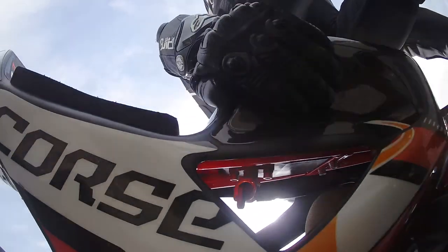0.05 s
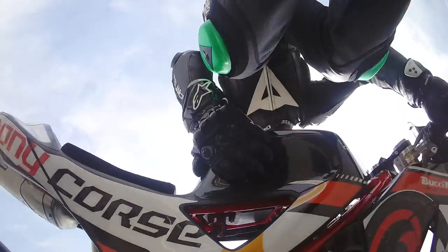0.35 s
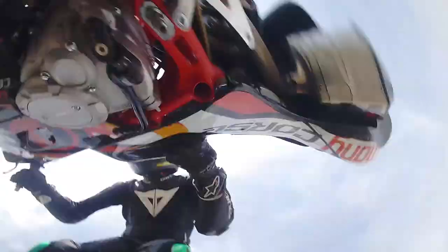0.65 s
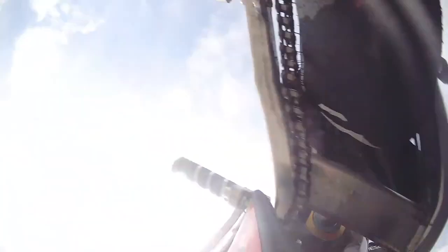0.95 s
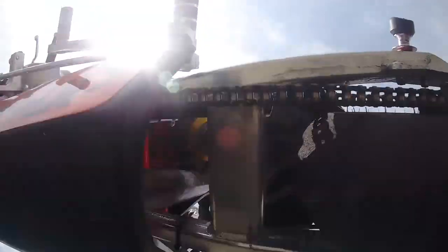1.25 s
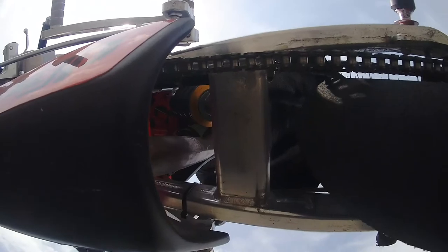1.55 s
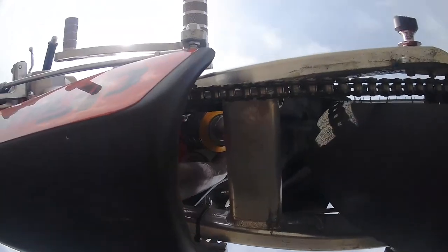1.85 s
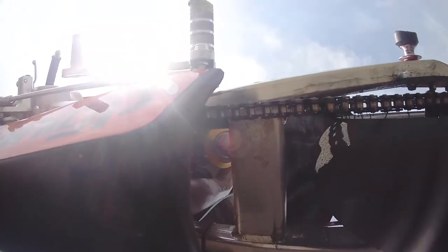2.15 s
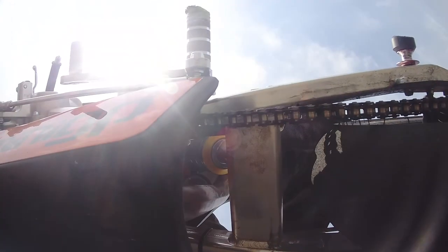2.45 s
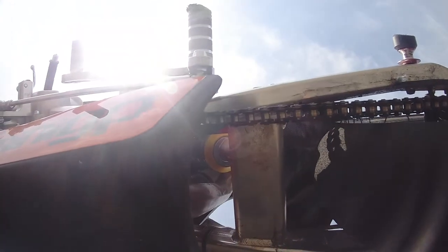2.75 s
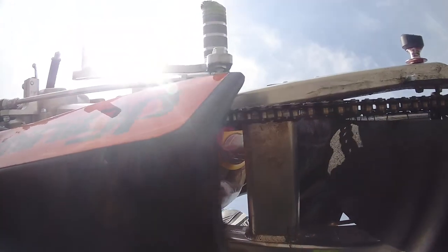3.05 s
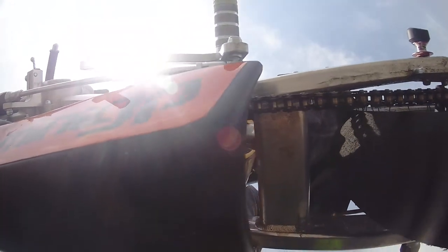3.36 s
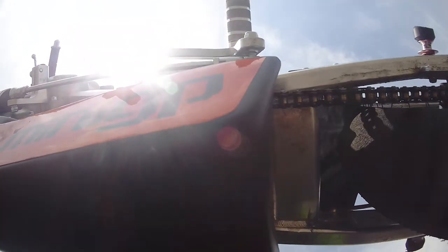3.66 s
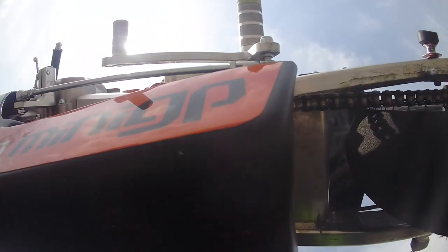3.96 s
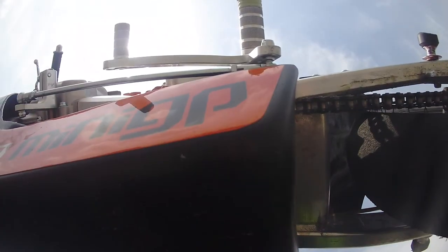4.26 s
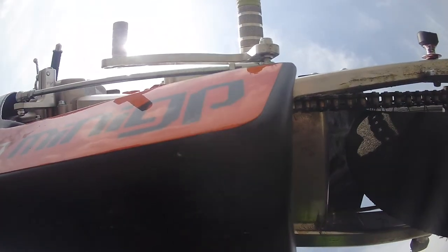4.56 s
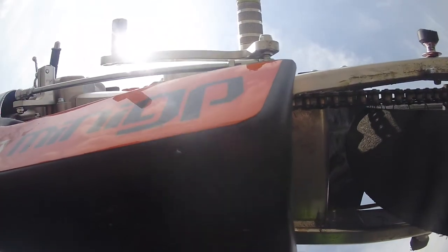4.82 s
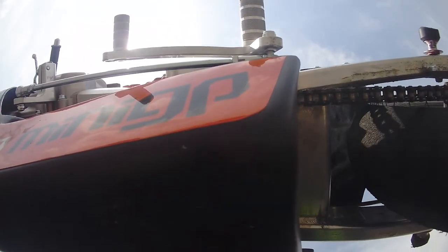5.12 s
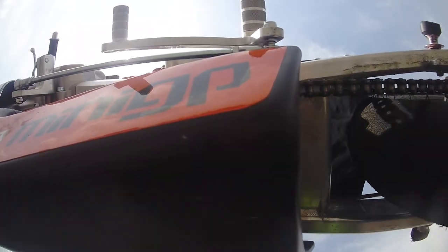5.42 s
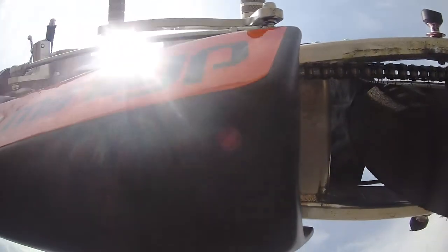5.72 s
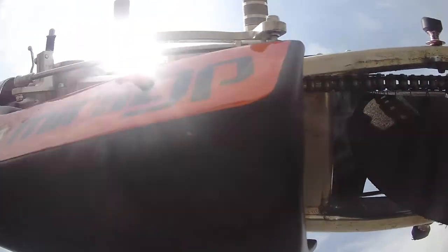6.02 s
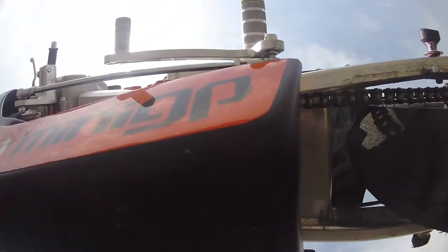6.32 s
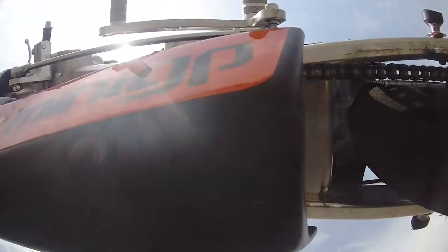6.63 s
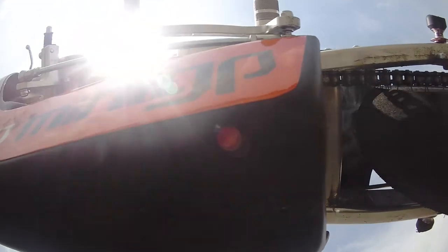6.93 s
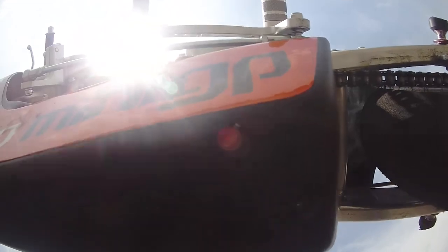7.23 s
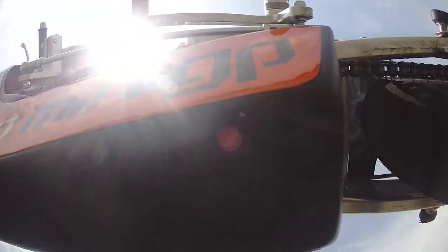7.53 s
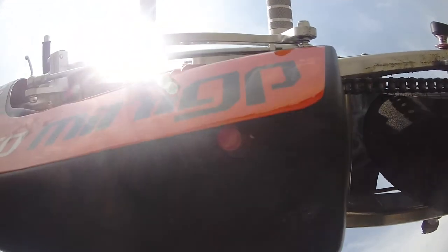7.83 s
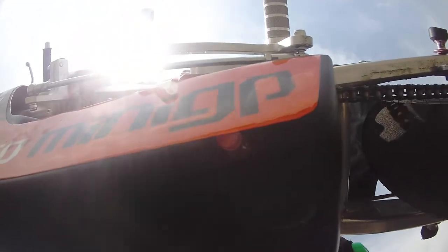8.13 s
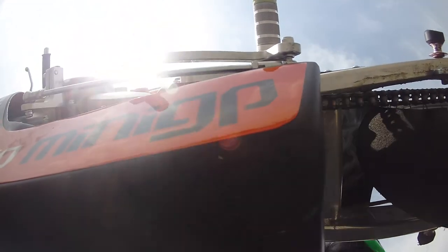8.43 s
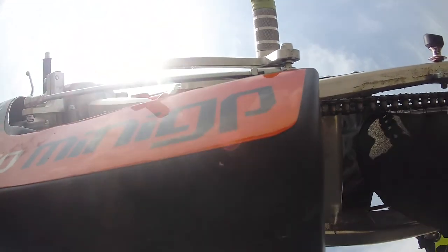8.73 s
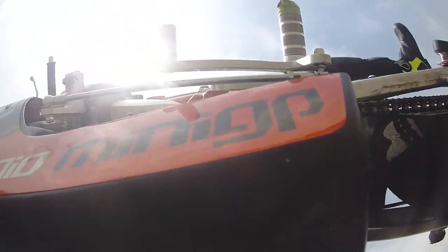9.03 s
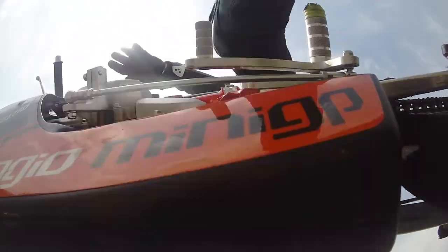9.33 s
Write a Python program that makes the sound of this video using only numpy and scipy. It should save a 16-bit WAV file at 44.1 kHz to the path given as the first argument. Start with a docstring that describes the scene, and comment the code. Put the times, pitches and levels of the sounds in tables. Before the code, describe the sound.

Loud clattering and scraping of a falling motorbike, heard from on board, ends in a short low hum, leaving small knocks and faraway engines.

```python
"""A small motorbike falls on asphalt, heard from a cased camera bolted to it. Two distant engines drone
throughout. At 0.5 s the case begins to strike and scrape the ground, each impact exciting its modes.
At 1.3 s the slide ends; the camera rocks between the stops of its springy mount, then swings freely.
From about 2 s, rubs, clinks, knocks and squeaks come through the mount, with a hard knock at 9.3 s."""
import sys
import numpy as np
from scipy import signal
from scipy.fft import rfft, irfft, next_fast_len
from scipy.io import wavfile
from scipy.ndimage import uniform_filter1d, minimum_filter1d, map_coordinates

SR = 44100
rng = np.random.default_rng(int(sys.argv[2]) if len(sys.argv) > 2 else 0)


def put_to_file(sound):
    """Save the sound as 16-bit audio at rate SR, in the file named by the first command-line argument."""
    columns = np.atleast_2d(sound).T  # one column per channel
    safe = np.clip(columns, -1, 1)
    whole_steps = np.round(safe * 32767)
    wavfile.write(sys.argv[1], SR, whole_steps.astype(np.int16))


N = 413658

CHATTER_S, CHATTER_DB = .0058, -4.5  # nominal spacing of repeated contacts; their level re the first
SLIDE_END_S, GRIT_DB = 1.32, -12.5  # the slide slows evenly to rest; scrape re blow at full speed
# The case strikes the asphalt. Each row: start in seconds, level in dB, skid length in seconds,
# roughness of the spot in dB, pitch of the hollow clank in Hz.
GROUND_STRIKES = [(0.496, 16.5, 0.0034, -2.5, 654), (0.507, 10, 0.015, -3, 503),
                  (0.542, 10, 0.0058, -5, 513), (0.558, 8.5, 0.0018, -5, 426), (0.613, 9.5, 0.0011, 4, 547),
                  (0.634, 13.5, 0.0061, -6.5, 466), (0.663, 4, 0.0046, 0.5, 367),
                  (0.708, 11, 0.012, -0.5, 535), (0.75, 7, 0.0013, 6, 320), (0.802, 8.5, 0.0055, 4, 630),
                  (0.830, 15, 0.0006, -3.5, 427.5), (0.847, 6, 0.01, 0, 637), (0.882, 8, 0.0054, -4.5, 456),
                  (0.908, 9, 0.0053, 4.5, 423.7), (0.926, 6, 0.00062, 1.5, 312),
                  (0.981, 13.5, 0.00099, -1.5, 408.1), (1.012, 11, 0.0013, 2.5, 516),
                  (1.044, 11.5, .012, 4, 412.4), (1.072, 9, 0.00087, -1, 390),
                  (1.1207, 14, 0.0011, 2.5, 623), (1.132, 12, 0.0088, 3, 486),
                  (1.2126, 15.5, 0.00064, 3.5, 754), (1.244, 4, 0.00088, 1.5, 710),
                  (1.255, 5.5, .0005, 12, 900), (1.2578, 13.5, 0.0005, 6, 405),
                  (1.3011, 12.5, 0.006, 2.5, 842)]
def contacts():
    """Contact chatter: a skidding wall touches again after a whole number of its own cycles."""
    for s, db, skid_s, rough_db, clank_hz in GROUND_STRIKES:
        speed = max((SLIDE_END_S - s) / (SLIDE_END_S - GROUND_STRIKES[0][0]), .01)
        grit_db = GRIT_DB + rough_db + 20 * np.log10(speed)
        gap_s = max(round(CHATTER_S * clank_hz), 1) / clank_hz
        for k in range(5):
            touch = min(1, 1 + skid_s / CHATTER_S - k)
            if touch > 0:
                yield s + k * gap_s, db + CHATTER_DB * (k > 0) + 20 * np.log10(touch), grit_db, clank_hz


PINNED_S, PINNED_RING = 1.3, 0.43  # from here the ground presses on the case and shortens its ring
# Modes of the case. Each row: frequency in Hz, level in dB, free decay time (T60) in seconds.
CASE_MODES = [(584, -7.5, 0.047), (926, -4, 0.019), (1223, -9.5, 0.039), (1654, -16.5, 0.038),
              (3903, -30, 0.05)]
# Spectrum of scraped grit. Each row: frequency in Hz, relative density in dB.
GRIT_SPECTRUM = [(100, -18.5), (400, -3.5), (650, -9), (2400, -9), (3000, -18.5), (4000, -18),
                 (5200, -29.5), (16000, -56)]
def crash():
    """Impact excitation: each contact rings the case and the metal behind it, and drags it over grit."""
    t = np.arange(SR // 4) / SR
    body, drag_power = np.zeros((2, N))
    scatter = rng.standard_normal(size=(5 * len(GROUND_STRIKES), len(CASE_MODES), 2))
    for (s, db, grit_db, clank_hz), chance in zip(contacts(), scatter):
        free = PINNED_RING if s > PINNED_S else 1
        tilt_db_per_hz = (grit_db - GRIT_DB) / 4000  # a soft contact leaves the upper modes quiet
        modes = 0
        for k, ((hz, level, t60), (louder, detune)) in enumerate(zip(CASE_MODES, chance)):
            gain = (-1) ** k * amp(level + tilt_db_per_hz * hz + 2 * louder)
            loaded_hz = hz + 2 * detune / t60  # the ground's varying load shifts damped modes most
            modes += gain * ring(t, loaded_hz, free * t60)
        clank = ring(t, clank_hz, t60=free * .027)
        metal = amp(-24.5 + grit_db) * ring(t, hz=2277, t60=free ** 2 * 0.15)
        shove = amp(-5) * ring(t, hz=280 * amp(2 * chance[0, 1]), t60=0.03, hardness=2.8)
        lurch = amp(-8.5) * ring(t, hz=63, t60=0.045)
        add(body, s, amp(db) * (amp(-7) * (clank + modes) + metal + shove - lurch))
        scrape = np.exp(-(t / 0.0031) ** 2) + amp(-23) * fade(t, 0.019)
        add(drag_power, s, amp(db + grit_db) ** 2 * scrape)
    stones = unit(amp(3.1 * wobble(900)))  # single stones catch the case
    return body + noise(GRIT_SPECTRUM, amp(6.5) * np.sqrt(drag_power) * stones)


SWAY_HZ, SWAY_T60_S = 87.2, 0.63  # natural vibration of the camera on its mount
ROCK_S, FREE_S = 1.3235, 1.562  # the mount starts to rock; it no longer reaches its stops
SLACK_S, SHRINK = 0.026, .725  # time that play adds to the first cycle; its ratio from cycle to cycle
SWING_PEAK_S, SWING_RISE_DB_PER_S = 1.535, 81
# Spectrum of the joint's click at the far stop. Each row: frequency in Hz, relative density in dB.
JOINT_SPECTRUM = [(1300, 1), (2050, 12), (4000, 3.5), (4600, -40), (12000, -71)]
def rocking():
    """An oscillator with backlash: the mount hits both stops ever faster and lighter, then swings free."""
    time, t, cycle = np.arange(N) / SR, np.arange(SR // 4) / SR, np.arange(100)
    period = 1 / SWAY_HZ + SLACK_S * SHRINK ** cycle
    turns = np.interp(time, ROCK_S + np.cumsum(period) - period, cycle, left=-1)
    force = np.clip((FREE_S - time) / (FREE_S - ROCK_S), 0, 1)
    near, far = np.zeros((2, N))
    for stop, lag_cycles in [(near, 0), (far, 0.38)]:
        at = passes(np.maximum(turns - lag_cycles, -1))
        stop[at] = force[at] * amp(1.5 * rng.standard_normal(len(at)))  # no two touches are alike
    touches = amp(8) * (near + amp(-9) * far)
    arm = amp(-10) * ring(t, hz=217.1, t60=0.17, hardness=2.4)
    thud = amp(17) * ring(t, hz=171, t60=0.01, hardness=1.73)
    body = excite(touches, arm + thud)
    click = signal.fftconvolve(impulse(JOINT_SPECTRUM), fade(t, 0.0034) * rng.standard_normal(len(t)))
    buzz = amp(-4.5) * excite(far ** 0.45, click / np.linalg.norm(click))  # light touches still click
    swing_db = -0.5 + np.minimum(SWING_RISE_DB_PER_S * (time - SWING_PEAK_S), 0)
    decay = fade(np.maximum(time - SWING_PEAK_S, 0), SWAY_T60_S)
    swing = amp(swing_db) * decay * np.sin(2 * np.pi * turns)
    scuff = case_noise(amp(-29.5) * excite(touches, fade(t, 0.03)))
    return body - swing + buzz + mount_stops(touches) + scuff


# Knocks through the mount. Each row: start in seconds, level in dB, pitch in Hz.
MOUNT_KNOCKS = [(1.1502, -7, 241), (1.161, -0.5, 165.6), (1.176, 6, 173), (1.187, 3, 201.6),
                (1.264, -4.5, 198), (1.275, 2.5, 209.4), (1.722, -27, 246), (2.061, -29.5, 241),
                (2.105, -35, 240), (5.581, -26, 253), (5.689, -21.5, 228), (5.728, -20, 241),
                (6.326, -32.5, 227), (6.371, -28, 235), (7.208, -29.5, 262), (7.316, -18.5, 242),
                (7.575, -15.5, 291), (7.594, -19, 163.6), (7.986, -33, 238), (8.227, -24, 238),
                (8.2348, -17.5, 245), (9.311, -7.5, 241.5), (9.344, -1.5, 251)]
# Jolts that set the camera swaying. Each row: start in seconds, level in dB.
SWAY_JOLTS = [(6.372, -29.5), (7.575, -23.5), (9.312, -13.5)]
def knocks():
    """Damped free vibration: soft blows thud, ring the mount's arm, tap its stops and tick its joint."""
    t = np.arange(SR) / SR
    body, ticks, blows = np.zeros((3, N))
    for s, db, hz in MOUNT_KNOCKS:
        thud = amp(13.5) * ring(t, hz, t60=0.021, hardness=0.92)
        arm = ring(t, hz * (1 + 0.04 * rng.standard_normal()), t60=0.12, hardness=1)
        add(body, s, amp(db) * (thud + arm))
        add(ticks, s, amp(-22.5 + 0.94 * db) * fade(t, 0.035))
        blows[round(s * SR)] = amp(db)
    for s, db in SWAY_JOLTS:
        add(body, s, amp(db) * ring(t, SWAY_HZ, SWAY_T60_S, hardness=1))
    return body + mount_stops(blows) + case_noise(ticks)


# Modes of the mount's stops. Each row: frequency in Hz, relative level in dB, T60 in seconds.
STOP_MODES = [(620, 6, 0.021), (1120, -6.5, 0.018)]
def mount_stops(force):
    """Resonance: the stops ring briefly under each blow."""
    return struck(STOP_MODES, amp(-15) * force)


# Things rubbing on the bike. Each row: start in seconds, length in seconds, level in dB.
RUB_STROKES = [(0.01, 0.18, -56.5), (1.981, 0.26, -62.5), (2.339, 0.019, -48.5), (5.07, 0.52, -62.5),
               (5.508, 0.13, -48), (5.68, 0.079, -39.5), (5.986, 0.036, -53), (6.302, 0.23, -59.5),
               (7.203, 0.036, -49), (7.253, 0.28, -62), (7.575, 0.02, -37.5), (8.094, 0.04, -57.5),
               (8.226, 0.042, -45), (9.132, 0.4, -49.5), (9.295, 0.048, -54)]
# Spectrum of dry friction in the mount. Each row: frequency in Hz, relative density in dB.
RASP_SPECTRUM = [(300, 2.5), (700, 15), (1750, -7.5), (2400, 3.5), (2850, -9), (4000, -6), (4900, -20.5),
                 (12000, -47)]
# Modes of small metal parts. Each row: frequency in Hz, relative level in dB, T60 in seconds.
PART_MODES = [(1226, 4, 0.014), (2487, -5.5, 0.025), (3440, 1.5, 0.007)]
def rubs():
    """Stick-slip friction: uneven rubbing rasps, stirs the mount's arm and rings the small parts."""
    pressure = np.zeros(N)
    for s, length, db in RUB_STROKES:
        add(pressure, s, amp(db) * signal.windows.tukey(round(length * SR), .15))
    pressure *= unit(amp(3.2 * wobble(130)))
    slips = (rng.random(N) < 1500 / SR) * rng.standard_normal(N)  # about 1500 a second
    arm = noise([(130, -33), (245, 8.5), (400, -13.5), (1500, -55)], amp(7) * pressure)
    return noise(RASP_SPECTRUM, pressure) + struck(PART_MODES, amp(-6) * pressure * slips) + arm


# Loose parts settling. Each row: start in seconds, level in dB, pitch in Hz.
LOOSE_CLINKS = [(2.111, -43, 2350), (2.174, -44, 2640), (2.341, -32, 1180), (2.448, -49, 2530),
                (2.7217, -52, 3280), (4.542, -45, 2480), (5.685, -40, 2320), (5.739, -32, 2490),
                (6.626, -42.5, 3360), (7.347, -43, 3290), (8.3285, -46, 2030), (8.374, -47, 1250)]
def clinks():
    """Light impacts: each loose part ticks and rings at its own natural frequency."""
    t = np.arange(SR) / SR
    rings, ticks = np.zeros((2, N))
    for s, db, hz in LOOSE_CLINKS:
        add(rings, s, amp(db + 0.5) * ring(t, hz, t60=0.023, hardness=0.55))
        add(ticks, s, amp(db - 6) * fade(t, .04))
    return rings + case_noise(ticks)


# Squeaking slips. Each row: start in seconds, length in seconds, pitch in Hz, level in dB.
SQUEAKING_SLIPS = [(2.19, 0.095, 3330, -61), (5.503, 0.11, 2300, -53.5), (6.751, 0.041, 1080, -55)]
def squeaks():
    """Periodic stick-slip: where slips fall into step, friction sings a short unsteady note."""
    out = np.zeros(N)
    for s, length, hz, db in SQUEAKING_SLIPS:
        size = round(length * SR)
        turns = np.cumsum(hz * (1 + 0.026 * wobble(350)[:size])) / SR
        add(out, s, amp(db) * np.hanning(size) ** .5 * np.sin(2 * np.pi * turns))
    return out


# Spectra of a firing's boom and of its hard edge. Each row: frequency in Hz, relative level in dB.
BOOM_SPECTRUM = [(35, -25.5), (80, -0.5), (150, 6.5), (200, -6), (330, -25.5), (1200, -71)]
BARK_SPECTRUM = [(110, -47.5), (260, 8.5), (700, -12), (1300, -43)]
def engine(firing_rates):
    """A pulse train: one uneven exhaust pulse per firing, smeared by reflections; gives (boom, bark)."""
    rate, = curves(firing_rates)
    turns = np.cumsum(rate) / SR + .002 * wobble(20)
    pulses = np.zeros(N)
    pulses[passes(turns)] = 1
    pulses *= amp(wobble(40))
    t = np.arange(SR // 10) / SR
    paths = rng.standard_normal(len(t)) * fade(t, .16)
    paths *= amp(-6) / np.linalg.norm(paths)
    paths[0] = 1  # the direct sound
    shapes = [signal.fftconvolve(impulse(colour), paths) for colour in (BOOM_SPECTRUM, BARK_SPECTRUM)]
    return np.array([unit(excite(pulses, shape)) for shape in shapes])


def throttle(firing_rates):
    """Output follows load: an engine's gain rises as it gathers speed and falls as it coasts."""
    rate, = curves(firing_rates)
    growth_per_s = np.gradient(np.log(rate)) * SR
    return amp(26.5 * uniform_filter1d(growth_per_s, size=SR // 4))


THIN_BELOW_DB, THIN_HZ = -48.5, 121  # a drone fainter than this loses the bass below this frequency
# Two single-cylinder engines, slowing for corners. Each row: time in seconds, firings per second.
FIRST_FIRING = [(0, 27), (2.05, 23.8), (2.9, 26.7), (4, 28.95), (5.2, 31.3), (7.7, 26.2), (9.4, 31)]
SECOND_FIRING = [(0, 35.16), (1.8, 36.23), (3.3, 40.3), (4.08, 44.5), (4.5, 41.3), (7.05, 35.16),
                 (8.3, 44.2), (9.3, 50.72)]
# Their joint drone. Each row: time in seconds, level in dB.
DRONE_LEVELS = [(0.004, -39), (1.95, -42), (2.93, -43), (3.19, -53.5), (3.58, -60), (4.63, -49.5),
                (5.61, -42), (6.04, -47), (6.52, -45), (6.81, -49.5), (7.64, -44), (9.25, -45.5)]
def distant_bikes():
    """Superposition: two engines on the circuit merge with their scattered echo and the rush of air."""
    drone_db, = curves(DRONE_LEVELS)
    first, second = throttle(FIRST_FIRING), amp(-1.5) * throttle(SECOND_FIRING)
    pull = np.hypot(first, second)
    first_boom, first_bark = first * engine(FIRST_FIRING)
    second_boom, second_bark = second * engine(SECOND_FIRING)
    # the bark is harder under throttle, and in the faster engine
    bark = (amp(-7) * first_bark + second_bark) * pull * amp(-42 + .5 * drone_db)
    echo = amp(-20) * noise(BOOM_SPECTRUM)
    bikes = (first_boom + second_boom) / pull + echo
    bass = filtered(bikes, lambda hz: 1 / (1 + (hz / THIN_HZ) ** 10))
    fullness = amp(np.minimum(4 * (drone_db - THIN_BELOW_DB), 0))
    drone = amp(drone_db) * (bikes - (1 - fullness) * bass)
    air = case_noise(amp(-50.5 + 0.26 * drone_db + wobble(60)))
    return drone + bark + air


# What the closed case lets through. Each row: frequency in Hz, relative density in dB.
CASE_TRANSMISSION = [(150, -23), (400, 3.5), (960, -5.5), (1300, -2.5), (1750, -13), (2450, -11.5),
                     (3500, -13.5), (4200, -23.5), (5200, -37.5), (15000, -69)]
def case_noise(envelope):
    """Transmission loss: the case muffles noise that passes through it."""
    return noise(CASE_TRANSMISSION, envelope)


def hiss():
    """Self-noise: each microphone adds its own hiss, weaker in the treble."""
    white = amp(-69.5) * rng.standard_normal((2, N))
    return filtered(white, lambda hz: amp(along([(2000, 6.5), (14000, -5.5)], hz)))


# Likeness of the two microphone ports. Each row: frequency in Hz, left-right correlation.
PORT_CORRELATION = [(300, 1), (2300, 0.78), (4500, 0.33)]
def noise(spectrum, envelope=1):
    """Partial coherence: coloured noise of this rms envelope, alike at both ports in the bass only."""
    angle = lambda hz: np.arccos(np.clip(along(PORT_CORRELATION, hz), -1, 1)) / 2
    white = rng.standard_normal((2, N))
    mid, side = filtered(white, lambda hz: np.array([np.cos(angle(hz)), np.sin(angle(hz))]))
    ports = envelope * np.array([mid + side, mid - side])
    colour = impulse(spectrum)
    return signal.fftconvolve(ports, colour[None] / np.linalg.norm(colour), axes=1)[:, :N]


def struck(modes, force):
    """Modal superposition: an object answers a force with the sum of its modes."""
    t = np.arange(SR // 4) / SR
    response = sum(amp(db) * ring(t, hz, t60, hardness=0.45) for hz, db, t60 in modes)
    return excite(force, response / np.abs(response).max())


def ring(t, hz, t60, hardness=20):
    """A damped mode; a softer contact makes it build more slowly."""
    return np.sin(2 * np.pi * hz * t) * fade(t, t60) * (1 - np.exp(-hardness * hz * t))


def fade(t, t60):
    """Exponential decay, by 60 dB in t60 seconds."""
    return np.exp(-np.log(1000) * t / t60)


def excite(force, response):
    """Convolution of a force with an impulse response."""
    return signal.fftconvolve(force, response)[:N]


def impulse(spectrum, size=8192):
    """The minimum-phase pulse with this spectral shape."""
    cepstrum = irfft(np.log(amp(along(spectrum, np.fft.rfftfreq(size, 1 / SR)))))
    one_sample_delay = np.exp(-2j * np.pi * np.fft.rfftfreq(size))
    return irfft(np.exp(rfft(2 * cepstrum[1:size // 2], size) * one_sample_delay))


def filtered(x, response):
    """Linear filtering by a frequency response."""
    size = next_fast_len(N + SR // 2)
    return irfft(rfft(x, size) * response(np.fft.rfftfreq(size, 1 / SR)), size)[..., :N]


def wobble(rate):
    """A smooth random curve, rate knots a second."""
    return map_coordinates(rng.standard_normal(int(N * rate / SR) + 4), [np.arange(N) * rate / SR])


def along(points, hz):
    """Interpolation of (Hz, value) points on a log axis."""
    knots_hz, values = np.transpose(points)
    return np.interp(np.log(hz + 1), np.log(knots_hz + 1), values)


def curves(rows):
    """One value per sample for each column after the time."""
    s, *columns = np.transpose(rows)
    return [np.interp(np.arange(N) / SR, s, column) for column in columns]


def passes(turns):
    """Samples at which a running count passes a whole number."""
    return np.flatnonzero(np.diff(np.floor(turns)) > 0)


def add(track, s, sound):
    """Lay a sound into a track at s seconds."""
    start = max(0, round(s * SR))
    part = track[..., start:start + sound.shape[-1]]
    part += sound[..., :part.shape[-1]]


def amp(db):
    """Decibels to gain."""
    return 10 ** (np.asarray(db) / 20)


def unit(x):
    """Scaled to rms 1."""
    return x / np.sqrt(np.mean(x ** 2) + 1e-20)


def scene():
    """Superposition: structure-borne and airborne sound add at the microphones."""
    return crash() + knocks() + clinks() + rocking() + rubs() + squeaks() + distant_bikes() + hiss()


LIMIT_DB, MOST_CUT_DB, HOLD_S, RECOVER_DB_PER_S = -3, 10, .33, 28
def gain_control(x):
    """Automatic gain control: loud peaks turn the gain down; it holds, then creeps back."""
    hold, attack = round(HOLD_S * SR), SR // 500
    peak_db = 20 * np.log10(np.abs(x).max(axis=0) + 1e-9)
    needed_db = np.clip(LIMIT_DB - peak_db, -MOST_CUT_DB, 0)
    held_db = minimum_filter1d(needed_db, size=hold, origin=hold // 2 - attack, mode="nearest")
    recovery_db = RECOVER_DB_PER_S * np.arange(N) / SR
    gain_db = np.minimum.accumulate(held_db - recovery_db) + recovery_db
    return x * amp(uniform_filter1d(gain_db, size=attack))


LOW_HZ, TOP_HZ = 25, 15300
def record(dry):
    """Saturation: the crash turns the gain down and still overloads the band-limited input."""
    held = gain_control(signal.sosfilt(signal.butter(2, LOW_HZ, "high", fs=SR, output="sos"), dry))
    saturated = held / (1 + np.abs(held) ** 6) ** (1 / 6)
    return signal.sosfilt(signal.butter(12, TOP_HZ, fs=SR, output="sos"), saturated)


dry = scene()
out = record(dry)
put_to_file(out)
```